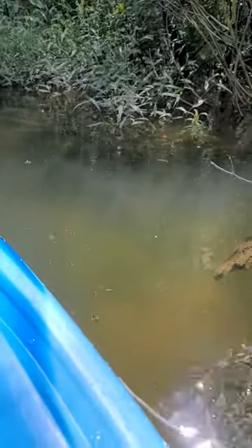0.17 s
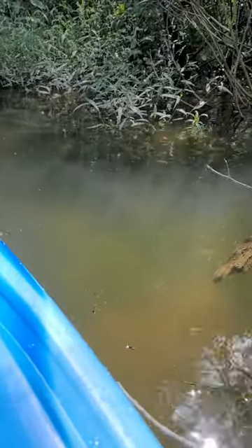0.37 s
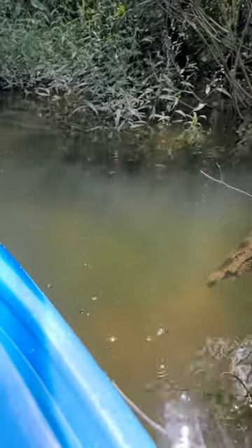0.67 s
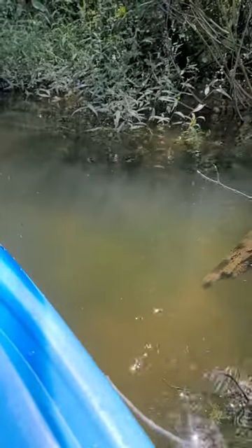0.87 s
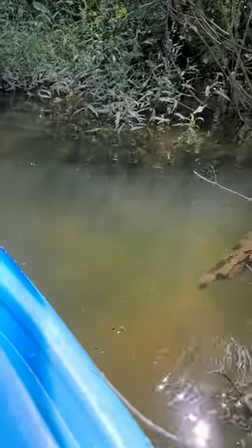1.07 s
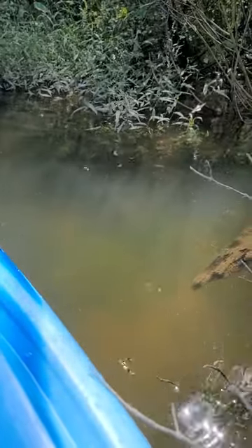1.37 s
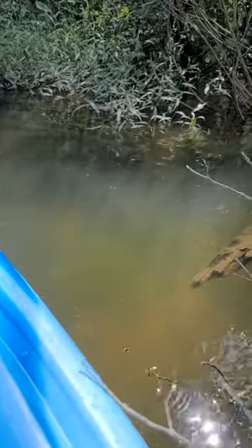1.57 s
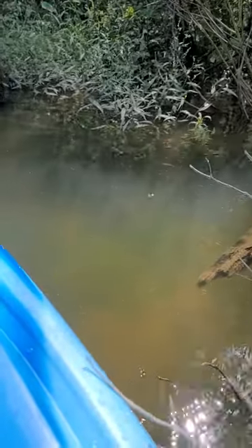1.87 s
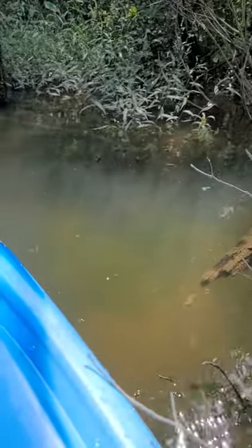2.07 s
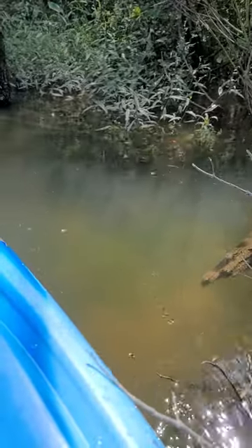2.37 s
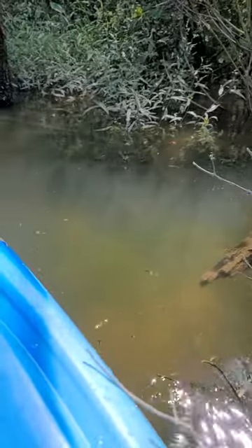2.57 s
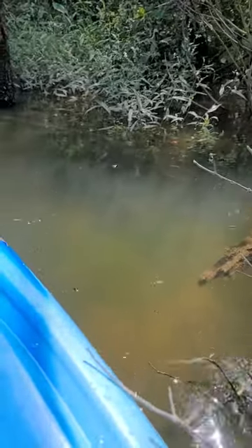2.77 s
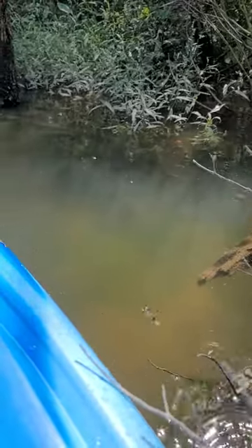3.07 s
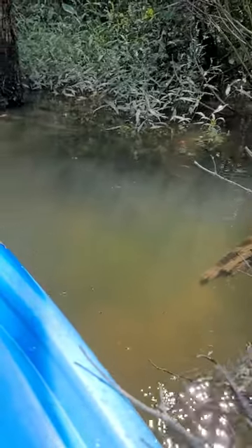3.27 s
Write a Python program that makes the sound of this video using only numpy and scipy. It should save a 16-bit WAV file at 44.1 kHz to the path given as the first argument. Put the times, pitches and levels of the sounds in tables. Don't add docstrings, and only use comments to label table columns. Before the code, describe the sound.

Katydids dominate: a dry, very high fluttering trill runs until about 0.8 s, while crisp ticks, roughly ten a second, run from 0.4 to 2.75 s. A new trill swells from 2.4 s, joined by another near 3 s. A distant insect hiss continues throughout. Quiet wavelets slap the plastic hull, bubbles plop at 2.5 s, and a hollow knock comes at 3.35 s over faint low engine hum and light wind.

```python
import sys
import numpy as np
from scipy import signal
from scipy.fft import rfft, irfft, next_fast_len
from scipy.io import wavfile
from scipy.ndimage import uniform_filter1d, map_coordinates

SR = 44100
rng = np.random.default_rng(int(sys.argv[2]) if len(sys.argv) > 2 else 0)


def gain_from_db(level_db):
    decades = np.asarray(level_db, float) / 20
    return 10 ** decades


def unload_wav(signal):
    wavfile.write(
        sys.argv[1],
        SR,
        np.round(np.clip(np.atleast_2d(signal).T, -1, 1) * 32767).astype(np.int16),
    )


N = 150822

# frequency_hz, level_db
AIR_SPECTRUM = [(53, -24), (90, -3), (104, -13), (164, -14.5), (202, -40.5), (228, -34), (319, -28),
                (884, -29.5), (6000, -36.5), (7800, -89), (13200, -120)]
# frequency_hz, correlation_0_to_1
AIR_LIKENESS = [(100, 1), (400, 0.022), (5000, 0)]
# time_s, level_db
GUSTS = [(0.0, -61), (0.08, -59.5), (0.25, -52.5), (0.33, -57.5), (1.84, -70.5), (2.26, -51), (2.29, -63.5),
         (3.07, -69), (3.14, -75), (3.3, -64), (3.35, -72), (3.42, -62)]
# frequency_hz, level_db
WIND_SPECTRUM = [(15, -21.5), (30, -8.5), (55, 0), (90, -12.5), (200, -20.5), (400, -120)]
# time_s, firing_hz, level_db, overtones_db
ENGINE = [(0, 76.95, -58, -9), (.4, 76.17, -50.5, -4), (.8, 77.1, -58.5, -1.5), (1.4, 78.3, -52, 0.5),
          (2, 78.16, -55, 1.5), (2.8, 79, -54.5, -1.5), (3.42, 78.8, -51.5, -2.5)]
ORDERS_DB = [2, -7.5, -26, -25.5]
# time_s, level_db
FROG_LEVEL = [(0, -91), (.35, -74), (.8, -76.5), (1.1, -80.5), (2.8, -88), (3.0, -75.5), (3.2, -74),
              (3.42, -75)]
# frequency_hz, level_db
CHORUS_SPECTRUM = [(2940, -93), (5000, -34), (5810, -35), (6730, -17), (8090, -21.5), (10100, -14.5),
                   (14000, 3), (14800, -3), (16000, -6)]
# time_s, level_db
CHORUS_LEVEL = [(0, -42.5), (.8, -41), (1.7, -41.5), (1.9, -45), (2.5, -43.5), (3.42, -38.5)]
# peak_s, peak_db, length_s, brightness_db
LAPS = [(0.069, -52.5, 0.027, 5), (0.11, -56, 0.019, -8), (0.204, -67, 0.058, 15), (0.308, -46, 0.028, -3),
        (0.547, -68, 0.076, 17), (0.65, -65.5, 0.026, 18), (1.085, -52.5, 0.03, 0), (1.236, -51, 0.025, 8),
        (1.5, -49, 0.035, -21), (1.965, -56, 0.057, 1), (2.491, -57, 0.023, -7), (2.643, -71.5, 0.036, 27),
        (2.811, -63, 0.05, -25), (3.347, -53, 0.03, 11)]
# frequency_hz, width_hz, level_db
HULL_MODES = [(212, 61, -3.5), (348, 58, 3), (462, 106, -6.5), (626, 216, -4.5), (777, 260, -9),
              (940, 83, -14.5)]
# frequency_hz, level_db
SPLASH_SPECTRUM = [(200, -53), (600, 3.5), (900, -6), (1500, -3), (2500, -10.5), (4000, -34)]
# frequency_hz, level_db
WASH_SPECTRUM = [(100, -27), (200, 1), (330, -2.5), (500, -3), (850, -8.5), (1100, -51), (2000, -87)]
# time_s, level_db
WASH_LEVEL = [(0, -66.5), (.7, -64.5), (1.5, -67), (2.3, -74), (3.2, -68), (3.42, -64)]
# pitch_hz, peak_db, t60_s
BUBBLES = [
    (1356, -44, 0.045),
    (1614, -40, 0.017),
    (1520, -42.5, 0.044),
    (1170, -62, 0.064),
    (1240, -60, 0.066),
    (840, -57.5, 0.1),
]
BUBBLE_STARTS = [2.503, 2.503, 2.510, 2.403, .13, 3.07]
# start_s, peak_db, brightness_db_per_octave
KNOCKS = [
    (3.343, -49, 5),
    (3.354, -42, -4.5),
    (5.2, -47, 2),
    (4.2, -54.5, -7),
    (0.295, -57, -2),
    (0.315, -55, 0),
    (1.238, -59, 4.5),
    (0.18, -62, -25.5),
    (0.10, -61, -18),
    (1.74, -67, -22),
]
# frequency_hz, level_db, t60_s
KNOCK_MODES = [(231.5, -8.5, 0.14), (341.6, 2, 0.13), (430, -4.5, 0.097), (540, -1, .11), (655, -4.5, 0.13),
               (744, -1, 0.11), (816, 6, 0.058), (950, -8, 0.092)]
# centre_s, level_db, left_minus_right_db
TICKS = [(0.425, -26.5, 2), (0.5094, -29.5, 6), (0.604, -28, 1), (0.687, -29, 11), (0.7685, -25, 1),
         (0.8469, -26.5, -3), (0.934, -27, 8), (1.03, -25.5, 3), (1.122, -26.5, -4), (1.2413, -25.5, 6),
         (1.346, -24.5, -4), (1.4338, -25.5, -5), (1.5211, -26, -1), (1.6135, -25, -4), (1.7153, -24, -1),
         (1.8191, -24.5, -1), (1.9203, -28, -5), (2.018, -26, -5), (2.115, -25.5, -1), (2.1748, -30, -2.3),
         (2.2126, -27, -3), (2.258, -32, -5), (2.3445, -29.5, 0), (2.413, -29.5, 0.6), (2.4996, -34, -10),
         (2.581, -31, 1), (2.751, -31, -0.1)]
# frequency_hz, level_db
TICK_WING = [(4410, -53.5), (7500, -43), (10100, -27.5), (11500, -22.5), (12900, -14), (14300, 1.5),
             (14800, -8.5), (15300, -1), (16000, -4.5)]
# frequency_hz, level_db
TRILL_WING = [(4410, -50.5), (7500, -26), (8990, -29.5), (11300, -17), (12400, -9), (13900, -1), (15100, 5),
              (16000, -4)]
# one_stroke_centre_s, rate_strokes_per_s
TRILLS = [
    (.1901, 35.0),
    (2.639, 35.5),
    (3.05, 35.0),
    (1.752, 30.5),
]
# time_s, level_db
EFFORT = [
    [(0, -31.5), (.45, -30.5), (.6, -33), (.76, -33), (.82, -83)],
    [(2.28, -78), (2.36, -40), (2.6, -31), (2.9, -30.5), (3.42, -35)],
    [(2.8, -74), (2.95, -43), (3.15, -35), (3.42, -33.5)],
    [(0, -53), (1.0, -41.5), (1.75, -38.5), (1.88, -49), (2.3, -38.5), (3.42, -42.5)],
]
# stroke_share_of_cycle, left_minus_right_db, wing (0 trilling, 1 ticking)
SINGERS = [
    (.85, 0.32, 0),
    (.9, -0.41, 0),
    (.9, 0.32, 0),
    (.9, -1.6, 1),
]


def unit(x):
    return x / np.sqrt(np.mean(x ** 2) + 1e-20)


def noise(*shape):
    return rng.standard_normal((*shape, N))


def along(points, hz):
    f, v = np.transpose(points)
    return np.interp(np.log(hz + 1), np.log(f + 1), v)


def curve(rows, column=1):
    rows = np.array(rows)
    return np.interp(np.arange(N) / SR, rows[:, 0], rows[:, column])


def wobble(rate):
    return map_coordinates(rng.standard_normal(400), [np.arange(N) * rate / SR])


def filtered(x, response):
    m = next_fast_len(N + SR // 2)
    return irfft(rfft(x, m) * response(np.fft.rfftfreq(m, 1 / SR)), m)[..., :N]


def coloured(x, spectrum):
    gain = lambda hz: gain_from_db(along(spectrum, hz))
    return filtered(x, gain) / np.sqrt(np.mean(gain(np.linspace(0, SR / 2, 4000)) ** 2))


def narrow(centre_hz, width_hz):
    return unit(filtered(noise(2), lambda hz: 1 / (1 + ((hz - centre_hz) * 2 / width_hz) ** 2)))


def sides(pan_db):
    return gain_from_db(np.array([[.5], [-.5]]) * pan_db)


def lagged(x, lag_s):
    return filtered(x, lambda hz: np.exp(-1j * np.pi * hz * lag_s * np.array([[1], [-1]])))


def hump(start_s, rise_s, hold_s, fall_s):
    t = np.arange(N) / SR - start_s
    return np.clip(t / rise_s, 0, 1) * np.exp(-np.clip(t - rise_s - hold_s, 0, 1) / fall_s)


def air():
    angle = lambda hz: np.arccos(along(AIR_LIKENESS, hz)) / 2
    mid, side = filtered(noise(2), lambda hz: np.array([np.cos(angle(hz)), np.sin(angle(hz))]))
    floor = unit(coloured(np.array([mid + side, mid - side]), AIR_SPECTRUM))
    return floor * gain_from_db(-62 + 0.19 * wobble(4.85))


def wind():
    return unit(coloured(noise(2), WIND_SPECTRUM)) * gain_from_db(curve(GUSTS) + 7.5) * sides(2.3)


def engine():
    phase = 2 * np.pi * np.cumsum(curve(ENGINE) + 1.636 * wobble(13)) / SR
    tone = 0
    for k, db in enumerate(ORDERS_DB):
        overtone_db = curve(ENGINE, column=3) if k > 0 else 0
        tone = tone + gain_from_db(db + overtone_db + 0.56 * wobble(16)) * np.cos((k + 1) * phase)
    return np.sqrt(2) * tone * gain_from_db(curve(ENGINE, column=2)) * sides(0.09)


def frog():
    return narrow(2226, 370) * gain_from_db(curve(FROG_LEVEL))


def crickets():
    return narrow(6820, 540) * gain_from_db(-65 + 0.59 * wobble(44) + 0.56 * wobble(4.65)) * sides(0.32)


def far_katydids():
    alike = 0.12
    mixed = np.sqrt(1 - alike) * noise(2) + np.sqrt(alike) * lagged(noise(), 0.000216)
    flutter_db = 1.27 * wobble(60) + 0.6 * wobble(6.47)
    return coloured(mixed, CHORUS_SPECTRUM) * gain_from_db(curve(CHORUS_LEVEL) + flutter_db) * sides(2.7)


def hull_response(hz):
    return sum((-1) ** k * gain_from_db(db) * 1j * hz * width / (centre ** 2 - hz ** 2 + 1j * hz * width)
               for k, (centre, width, db) in enumerate(HULL_MODES))


def laps():
    ring = unit(filtered(noise(), hull_response))
    splash = coloured(noise(), SPLASH_SPECTRUM)
    water = unit(coloured(noise(), WASH_SPECTRUM)) * gain_from_db(curve(WASH_LEVEL) + 3.6 * wobble(16))
    for s, db, length, bright in LAPS:
        envelope = hump(s - .004, 0.0014, length * 0.36, length * 0.92)
        water = water + gain_from_db(db - 7) * envelope * (ring + gain_from_db(bright - 14) * splash)
    loudness = np.sqrt(np.abs(uniform_filter1d(water ** 2, size=400)))
    spread = 0.62 * unit(filtered(noise(2), hull_response))
    return spread * loudness + lagged(sides(-5) * water, .00067)


def bubbles():
    out = 0
    for s, (hz, db, t60) in zip(BUBBLE_STARTS, BUBBLES):
        u = np.arange(N) / SR - s
        glide = -1.6 if hz < 1000 else 0
        cycles = hz * u * (1 + glide * np.clip(u, 0, .1))
        out = out + gain_from_db(db) * hump(s, .0015, 0, t60 / np.log(1000)) * np.sin(2 * np.pi * cycles)
    return lagged(sides(-1.4) * out, -0.00017)


def knocks():
    t, out = np.arange(N) / SR, 0
    for s, db, tilt_db in KNOCKS:
        u = np.clip(t - s, 0, None)
        contact = 1 - np.exp(-u / .002)
        for hz, level, t60 in KNOCK_MODES:
            mode_db = db + level + tilt_db * np.log2(hz / 400) - 60 * u / t60
            out = out + contact * gain_from_db(mode_db) * np.sin(2 * np.pi * hz * u)
    return lagged(sides(-5) * out, .00042)


def teeth():
    teeth_per_s, size_db, own_share = 15000, 1, 0.45
    struck = rng.random((3, N)) < teeth_per_s / SR
    clicks = struck * gain_from_db(size_db * noise(3)) * np.sign(noise(3))
    return unit(np.sqrt(1 - own_share) * clicks[0] + np.sqrt(own_share) * clicks[1:])


def ticks():
    rise_s, hold_s, fall_s = 0.0025, 0.0079, 0.0033
    strokes = 0
    for s, db, pan in TICKS:
        envelope = hump(s - rise_s - hold_s / 2, rise_s, hold_s, fall_s)
        strokes = strokes + gain_from_db(db + 0.5) * sides(pan) * envelope
    return coloured(strokes * teeth(), TICK_WING)


def trills():
    t, lean, jitter_cycles, song = np.arange(N) / SR, .25, .035, 0
    for (s, rate), (share, pan, wing), effort in zip(TRILLS, SINGERS, EFFORT):
        turn = (t - s) * rate + jitter_cycles * wobble(30.38)
        place = np.clip((turn - np.round(turn)) * 2 / share, -1, 1)
        stroke = np.cos(np.pi / 2 * place) ** 2 * (1 + lean * 2 * place / (1 + place ** 2))
        size = gain_from_db(curve(effort) + .8 * wobble(32))
        resonance = TICK_WING if wing == 1 else TRILL_WING
        song = song + coloured(sides(pan) * size * stroke * teeth(), resonance)
    return song


def patchy(x, depth_db):
    z = signal.stft(x, nperseg=256)[2]
    field = rng.standard_normal(z.shape[1:])
    for axis in (0, 1):
        field = uniform_filter1d(field, size=4, axis=axis)
    return signal.istft(z * gain_from_db(depth_db * unit(field)), nperseg=256)[1][:, :N]


def katydids():
    song = patchy(ticks() + trills(), 1.6)
    t60_s = 0.036
    decay = gain_from_db(-60 * np.arange(SR // 5) / SR / t60_s)
    tail = rng.standard_normal((2, SR // 5)) * decay
    tail = tail / np.linalg.norm(tail[0])
    scatter = signal.fftconvolve(song.mean(0)[None], tail, axes=1)[:, :N]
    return lagged(song, .00034) + gain_from_db(-7) * scatter


def scene():
    background = air() + wind() + engine() + frog() + crickets() + far_katydids()
    return background + laps() + bubbles() + knocks() + katydids()


def top_cut(x):
    return signal.sosfilt(signal.butter(12, 16960, fs=SR, output="sos"), x)


def record(dry):
    top_hz = 15750
    mix = filtered(dry, lambda hz: hz < top_hz)
    return top_cut(mix)


dry = scene()
out = record(dry)
unload_wav(out)
```